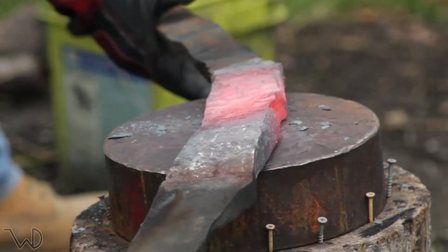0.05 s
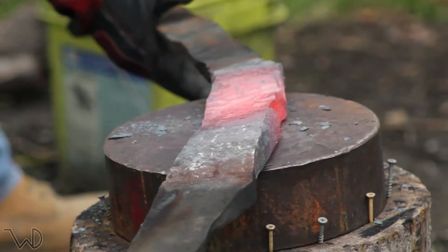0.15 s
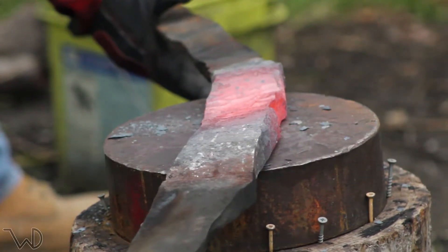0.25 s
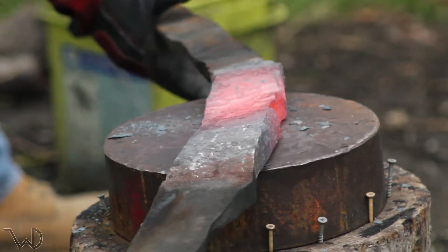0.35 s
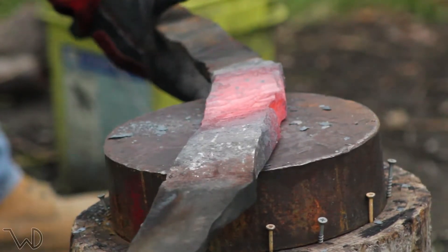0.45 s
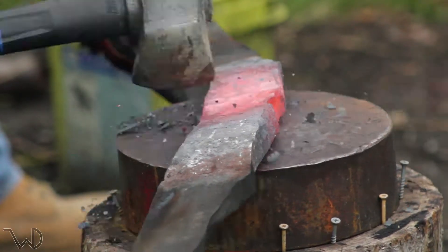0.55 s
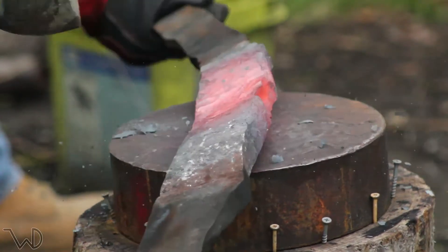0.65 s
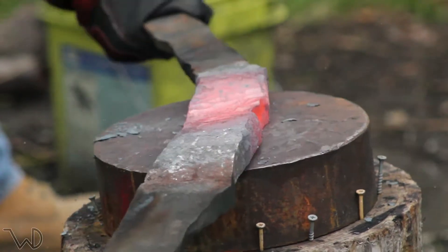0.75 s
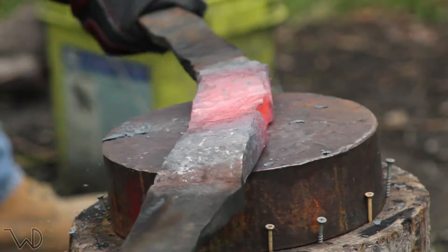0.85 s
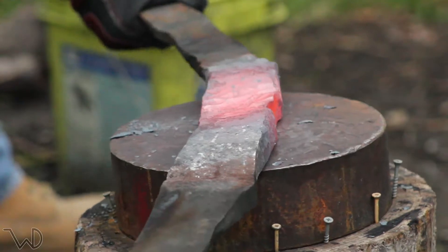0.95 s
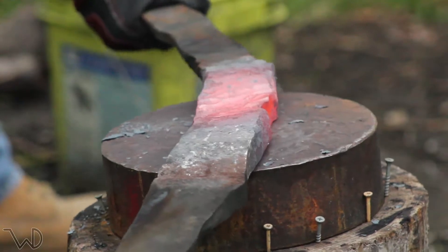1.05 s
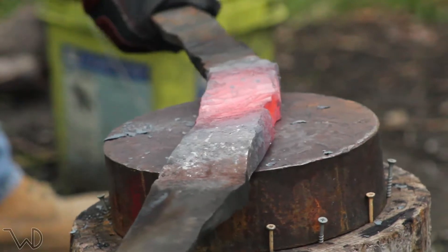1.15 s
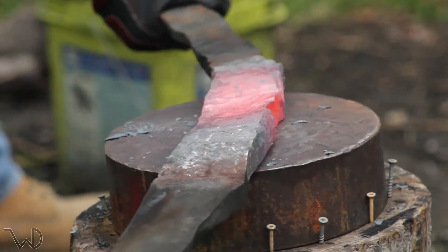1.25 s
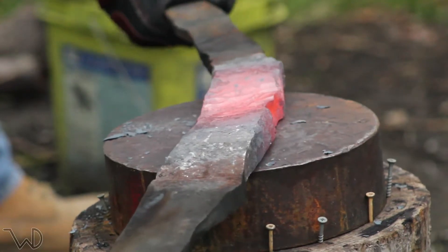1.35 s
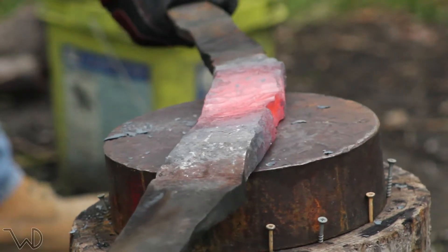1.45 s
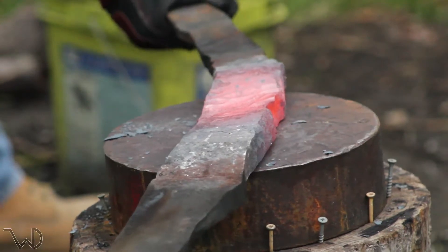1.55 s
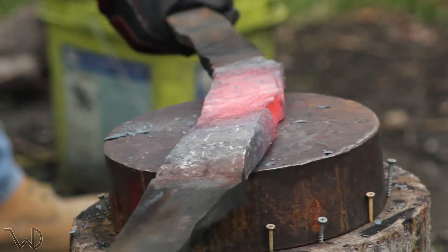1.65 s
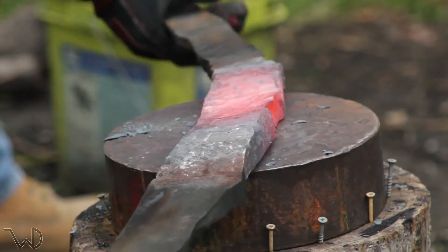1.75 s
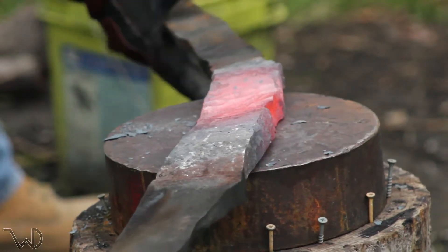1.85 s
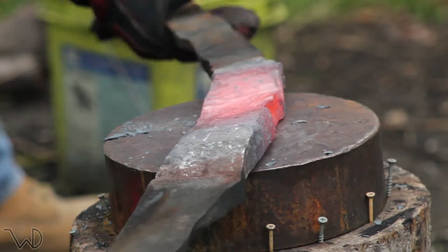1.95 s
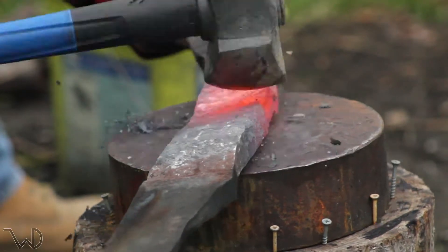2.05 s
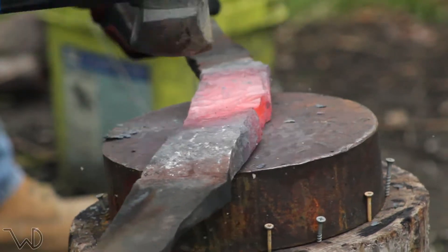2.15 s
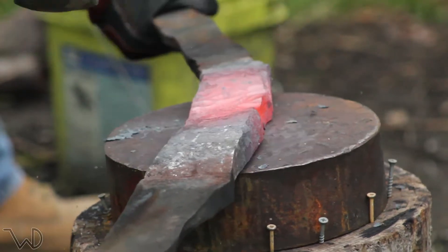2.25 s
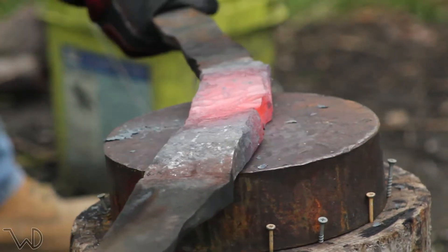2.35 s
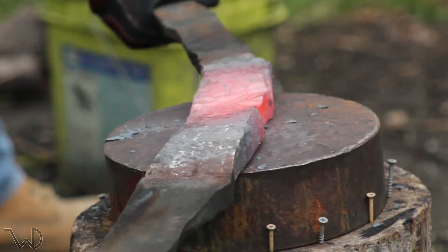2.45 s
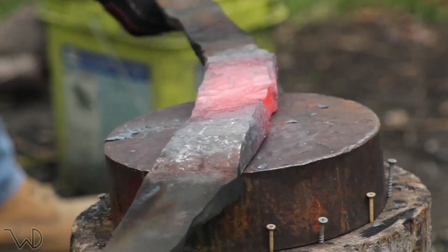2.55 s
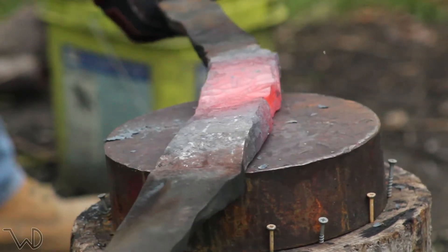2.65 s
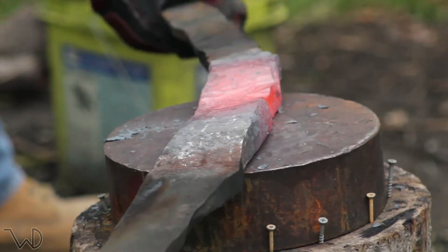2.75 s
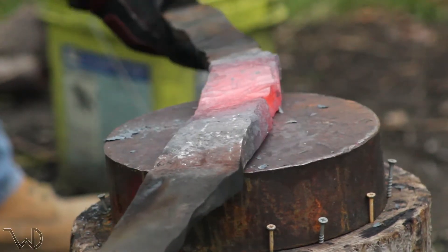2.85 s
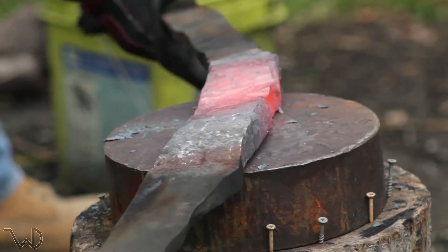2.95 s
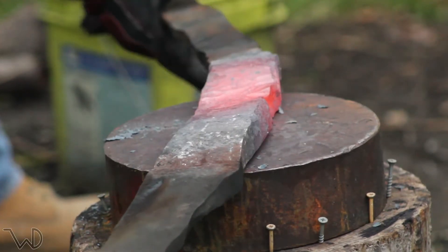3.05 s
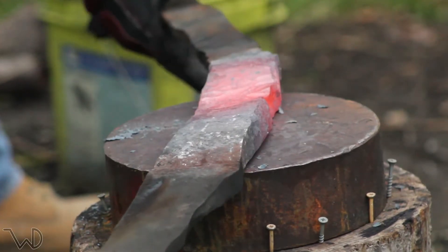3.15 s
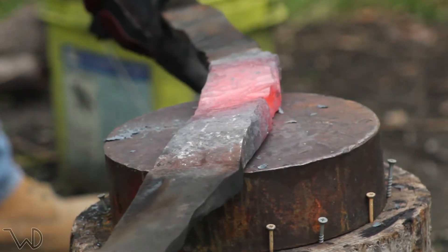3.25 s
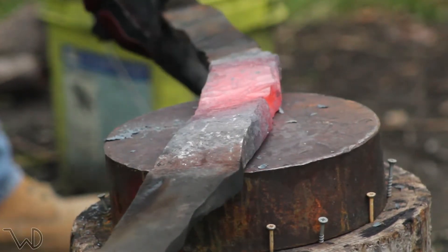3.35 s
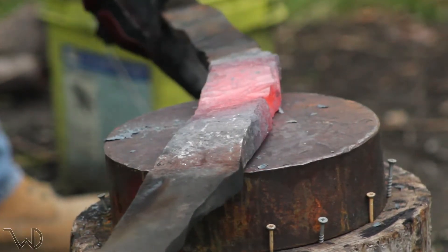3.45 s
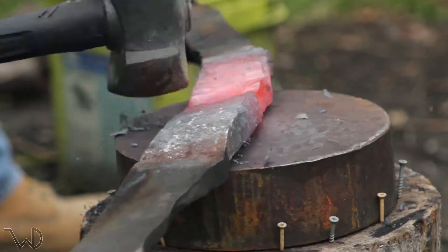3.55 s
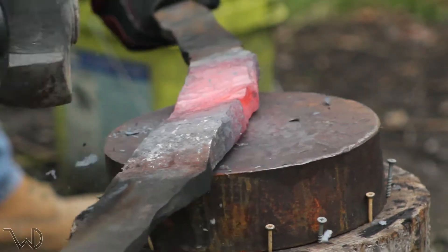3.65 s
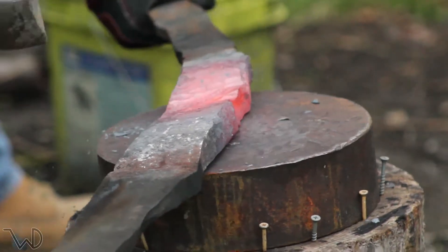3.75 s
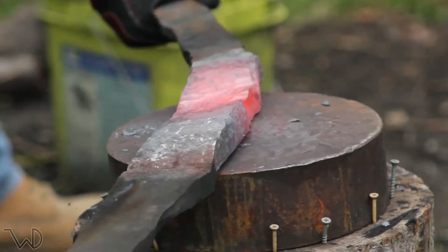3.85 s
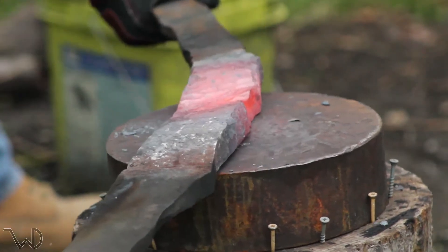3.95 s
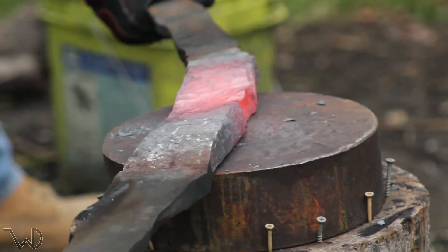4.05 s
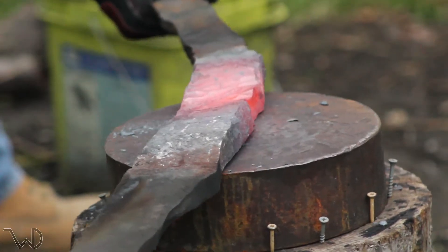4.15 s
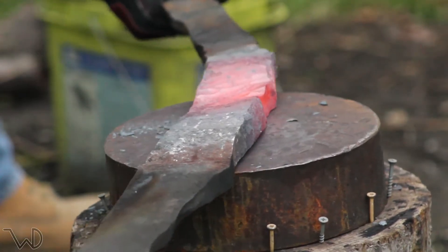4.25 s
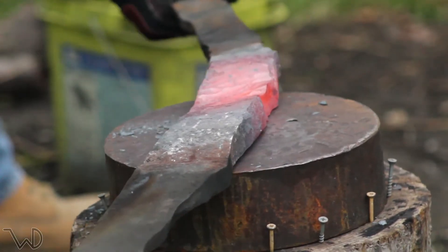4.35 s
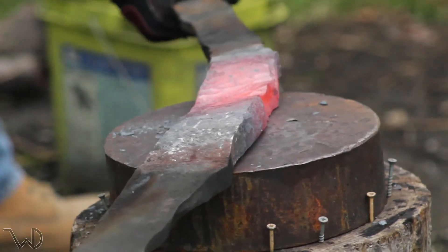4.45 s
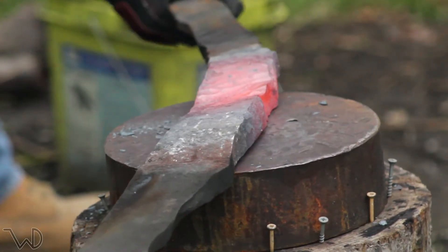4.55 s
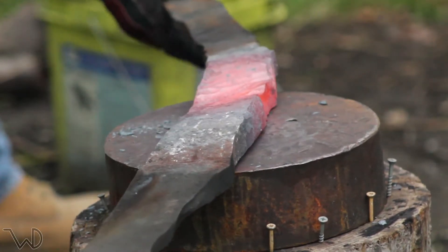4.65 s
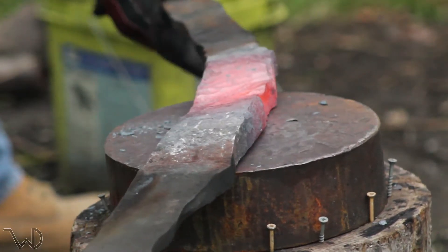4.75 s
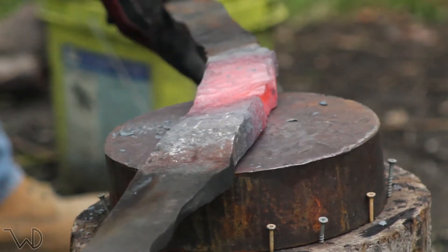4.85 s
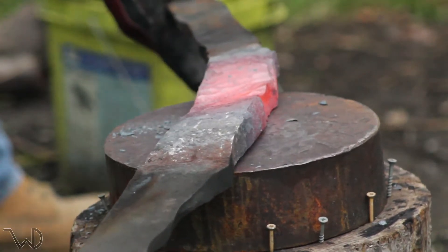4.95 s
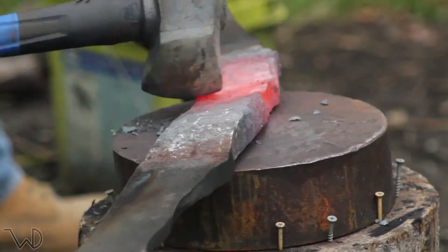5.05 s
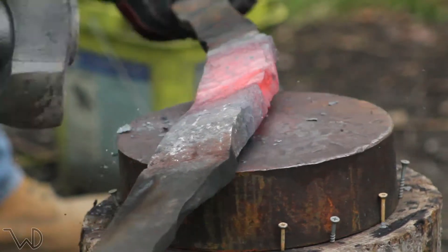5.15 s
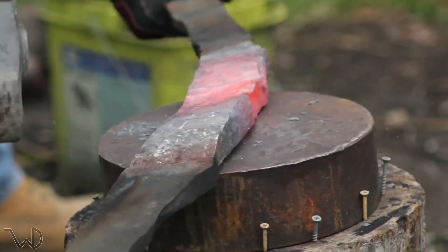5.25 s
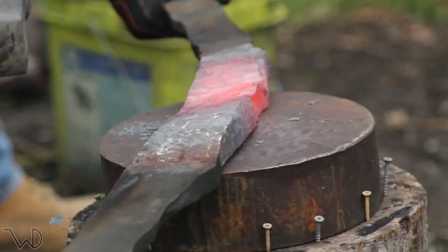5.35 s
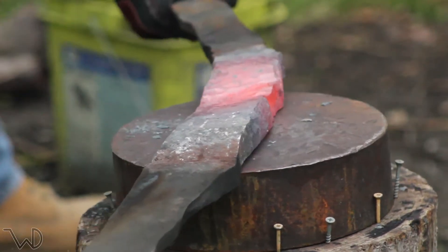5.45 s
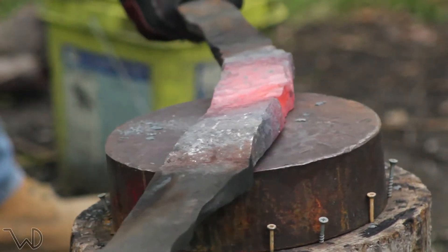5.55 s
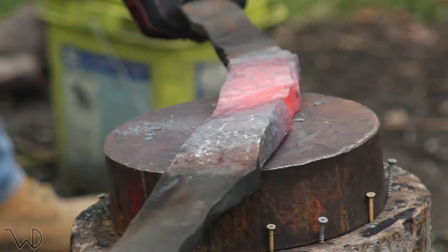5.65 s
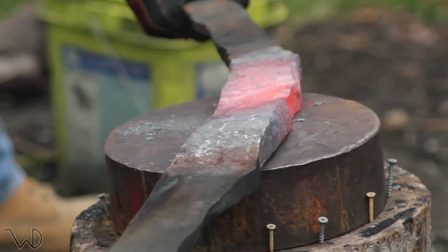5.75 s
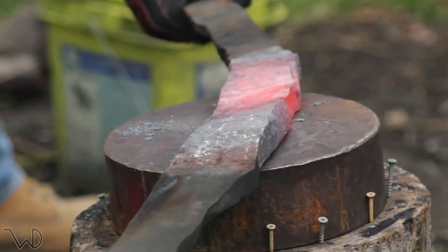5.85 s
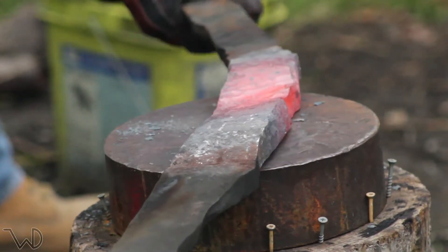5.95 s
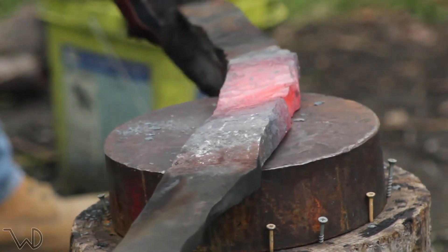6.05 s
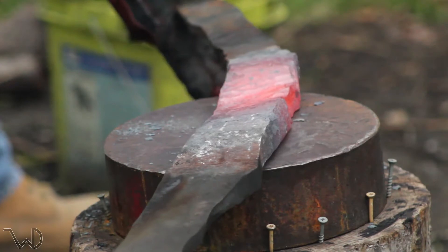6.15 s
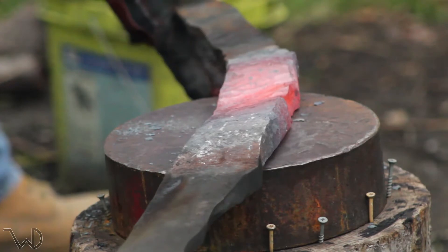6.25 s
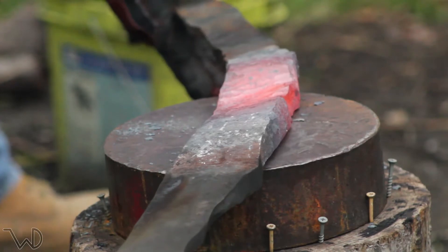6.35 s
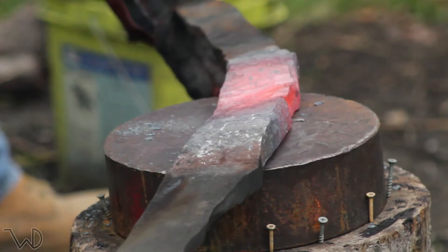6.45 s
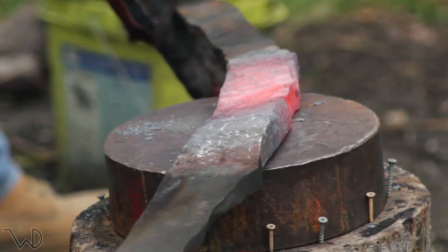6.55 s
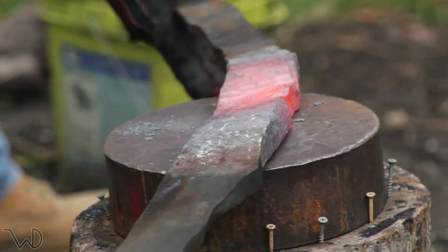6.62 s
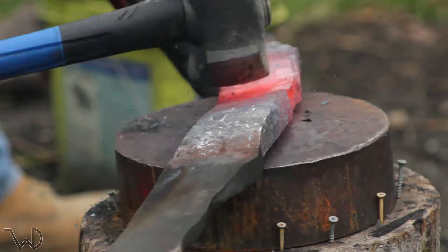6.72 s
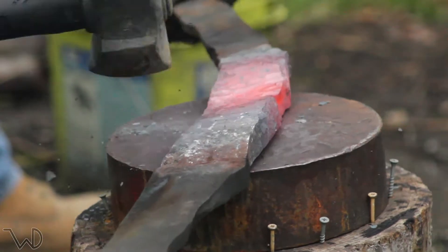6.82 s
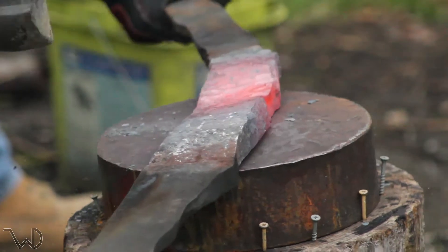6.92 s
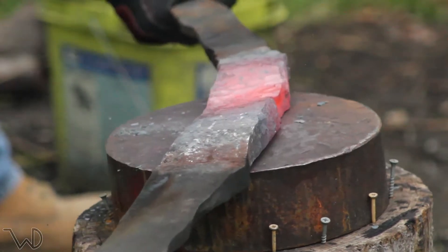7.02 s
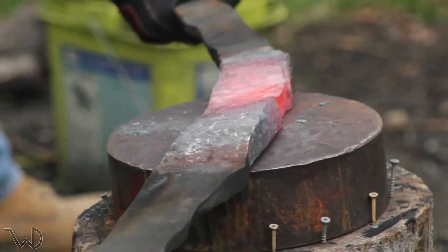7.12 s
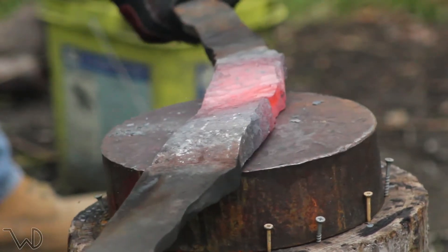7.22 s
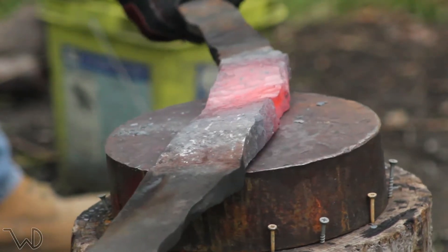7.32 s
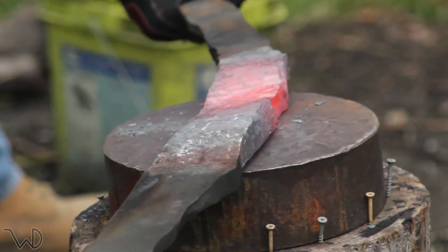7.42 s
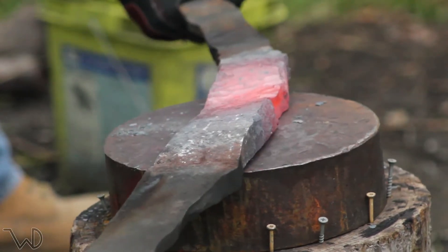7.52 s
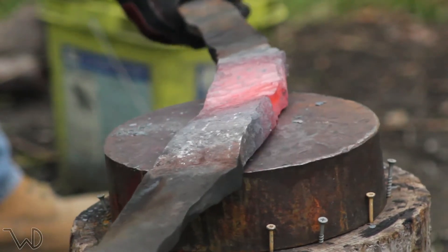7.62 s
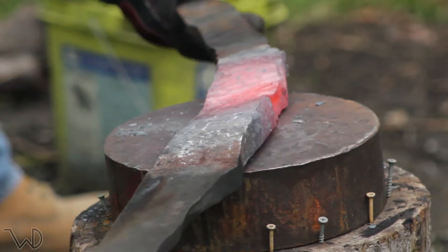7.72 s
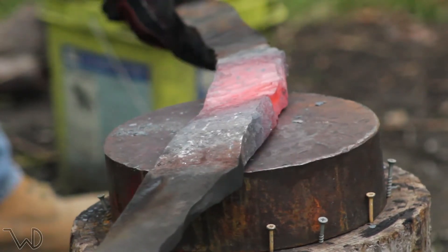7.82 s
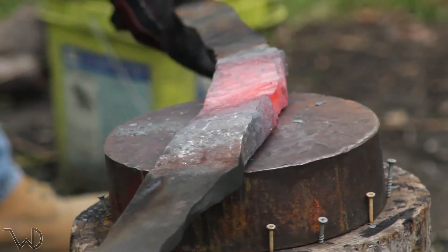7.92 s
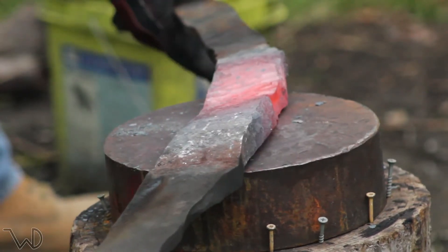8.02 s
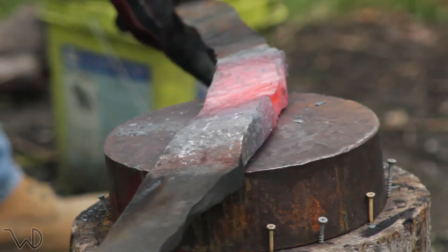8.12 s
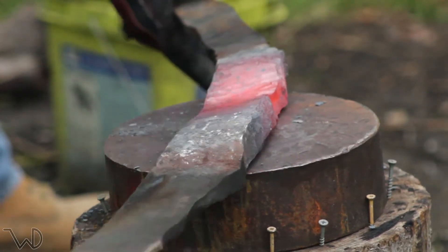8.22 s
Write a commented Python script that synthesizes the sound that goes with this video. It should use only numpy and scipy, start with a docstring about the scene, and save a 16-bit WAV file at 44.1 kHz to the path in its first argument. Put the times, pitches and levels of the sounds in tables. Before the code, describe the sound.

A hammer slowly strikes a steel blade on a metal block five times, each clang echoing over steady outdoor hiss and gusts.

```python
"""Five heavy hammer blows on a glowing steel blade, laid on a round steel block on a stump outdoors.
Blade, hammer and block ring as decaying modes and the yard throws the clang back; each blow clips the input.
Wind buffets the microphone over a steady outdoor hiss, and flakes of scale skitter off the block."""
import sys
import numpy as np
from scipy import signal
from scipy.fft import rfft, irfft, next_fast_len
from scipy.io import wavfile
from scipy.ndimage import uniform_filter1d

SR = 44100
rng = np.random.default_rng(int(sys.argv[2]) if len(sys.argv) > 2 else 0)


def put_to_file(sound):
    """Save the sound as 16-bit audio at rate SR, in the file named by the first command-line argument."""
    columns = np.atleast_2d(sound).T  # one column per channel
    safe = np.clip(columns, -1, 1)
    whole_steps = np.round(safe * 32767)
    wavfile.write(sys.argv[1], SR, whole_steps.astype(np.int16))


N = 365148
TIME_S = np.arange(N) / SR
RING_N = int(1.4 * SR)
AGE_S = TIME_S[:RING_N]


def from_db(db):
    """Decibels to gain."""
    return 10 ** (np.asarray(db) / 20)


def unit_rms(x):
    """Scale to rms 1."""
    return x / np.sqrt(np.mean(x ** 2) + 1e-20)


def at_hz(points, hz):
    """Interpolate a table over log frequency."""
    points_hz, values = np.transpose(points)
    return np.interp(np.log(np.maximum(hz, 1)), np.log(points_hz), values)


def decay(t60_s):
    """Envelope falling 60 dB in t60_s."""
    return np.exp(-np.log(1000) * AGE_S / max(t60_s, 1e-3))


def filtered(x, hz, kind, order=2):
    """Butterworth filter."""
    return signal.sosfilt(signal.butter(order, hz, kind, fs=SR, output="sos"), x)


def coloured_noise(spectrum, size):
    """Steady noise of the given spectrum, rms 1."""
    gain = from_db(at_hz(spectrum, np.fft.rfftfreq(size, 1 / SR)))
    return unit_rms(irfft(rfft(rng.standard_normal(size)) * gain, size))


def swell_power(rows):
    """Summed power of Gaussian swells."""
    return sum(from_db(db) ** 2 * np.exp(-np.minimum(((TIME_S - peak_s) / half_width_s) ** 2, 100))
               for peak_s, db, half_width_s in rows)


# hiss level: (time [s], level [dB])
HISS_LEVEL = [(0, -43), (2.5, -45.5), (8.28, -45.4)]
# hiss spectrum: (frequency [Hz], relative density [dB])
HISS_SPECTRUM = [(25, -22), (100, -11), (200, -6), (350, -1), (800, 0.5), (1400, -1), (2300, -3),
                 (5500, -6.5), (7500, -10), (9000, -18.5), (11000, -29), (13500, -42), (15000, -62)]
def outdoor_hiss():
    """Steady broadband hiss, easing a little."""
    level = from_db(np.interp(TIME_S, *np.transpose(HISS_LEVEL)))
    return level * coloured_noise(HISS_SPECTRUM, next_fast_len(N))[:N]


# wind gusts: (arrival [s], level [dB], hold [s])
WIND_GUSTS = [(.19, -56.5, .24), (.82, -46.5, 0.036), (1.5, -62, 0.26), (2.418, -56, 0.041),
              (3.165, -46.5, .02), (3.847, -53, .03), (4.408, -44, 0.85), (7.4, -47.5, 0.045)]
def breeze_power(draught_db=-68, rise_db_per_s=248, fall_db_per_s=62, flutter_db=2.3, flutter_hz=15):
    """Moving air: a faint draught plus gusts that rise fast, hold and fall slowly, all fluttering."""
    power = from_db(draught_db) ** 2
    for arrival_s, db, hold_s in WIND_GUSTS:
        rise_db = rise_db_per_s * np.maximum(arrival_s - TIME_S, 0)
        fall_db = fall_db_per_s * np.maximum(TIME_S - arrival_s - hold_s, 0)
        power = power + from_db(db - rise_db - fall_db) ** 2
    flutter = unit_rms(filtered(rng.standard_normal(N + SR), flutter_hz, "low")[SR:])
    return power * from_db(flutter_db * flutter) ** 2


# strongest buffets: (time [s], level [dB], half width [s])
WIND_BUFFETS = [(2.57, -38.5, .011), (4.03, -42, .009), (4.07, -38, 0.0045), (4.515, -29.5, 0.0074),
                (4.626, -23, .018), (4.67, -20, 0.0053), (4.706, -23.5, 0.0052), (4.812, -26.5, 0.0065),
                (4.872, -35.5, .012), (7.483, -34.5, 0.0049), (8.22, -44.5, 0.013)]
def wind(low_hz=85, calm_hz=210, strong_hz=380, calm_db=-45, strong_db=-22, window_s=0.0137):
    """Eddies at the microphone: a rumble that brightens with strength."""
    level = np.sqrt(breeze_power() + swell_power(WIND_BUFFETS))
    strength = np.clip((20 * np.log10(level) - calm_db) / (strong_db - calm_db), 0, 1)
    eddies = rng.standard_normal((2, N))
    slow = unit_rms(filtered(filtered(eddies[0], low_hz / 2, "high"), calm_hz, "low", order=3))
    fast = unit_rms(filtered(filtered(eddies[1], low_hz, "high"), strong_hz, "low", order=4))
    rumble = np.sqrt(1 - strength) * slow + np.sqrt(strength) * fast
    running_rms = np.sqrt(uniform_filter1d(rumble ** 2, int(window_s * SR)) + 1e-3)
    return level * rumble / running_rms


def air_slap(centre_hz=1050, level_db=10.5, t60_s=0.019):
    """The hammer's sudden stop pushes out a few uneven cycles of pressure."""
    puff = unit_rms(filtered(rng.standard_normal(RING_N), [centre_hz / 2, centre_hz * 2], "band"))
    return from_db(level_db) * puff * decay(t60_s)


# contact crack: (frequency [Hz], relative density [dB])
CRACK_SPECTRUM = [(40, -20), (150, -15.5), (450, -9), (800, -4), (1300, -2), (2400, -2), (4000, -3),
                  (6300, -5.5), (8000, -14), (10000, -17)]
def contact_crack(gain_db, base_db=5.5, t60_s=0.06):
    """Scale crushed under the hammer: a short noise burst."""
    return from_db(base_db + gain_db) * coloured_noise(CRACK_SPECTRUM, RING_N) * decay(t60_s)


def ring(modes, gain_db):
    """Struck modes: decaying sines of random polarity."""
    gains = from_db(gain_db) * rng.choice([-1, 1], len(modes))
    return sum(gain * from_db(db) * decay(t60_s) * np.sin(2 * np.pi * hz * AGE_S)
               for (hz, db, t60_s), gain in zip(modes, gains))


# blade pinched between hammer and block: (frequency [Hz], level [dB], t60 [s])
BLADE_MODES = [(900, -17, .06), (1002, -14, .12), (1208, -12, .11), (1262, -15, .08), (1332, -12, .12),
               (1462, -12, .1), (1555, -8.5, .11), (1688, -12, .13), (1885, -13, .17), (1962, -15, .08),
               (2141, -13, .14), (2372, -5.5, .08), (2480, -10, .045), (2641, -6.5, .16),
               (2986, -10.5, .12), (3160, -12, .06), (3320, -10, .12), (3500, -15, .06), (3636, -7, .19),
               (3810, -15, .07), (3955, -13, .08), (4059, -12, .12), (4185, -14, .1), (4545, -12, .07),
               (4936, -7, .16), (5026, -13, .1)]
def blade_ring(gain_db, tilt_db_per_oct, spot_hz, boost_db=5.0, half_width_oct=0.16):
    """Harder contact favours the upper modes; the struck spot boosts those near spot_hz."""
    mode_hz = np.array(BLADE_MODES)[:, 0]
    tilt_db = tilt_db_per_oct * np.log2(mode_hz / np.median(mode_hz))
    spot_db = boost_db * np.exp(-(np.log2(mode_hz / spot_hz) / half_width_oct) ** 2)
    return ring(BLADE_MODES, gain_db + tilt_db + spot_db)


# steel block: (frequency [Hz], level [dB], t60 [s])
BLOCK_MODES = [(5399, -14, .13), (5497, -11.5, .21), (6042, -18, .2), (6228, -19, .12), (6468, -19, .12),
               (6707, -21, .14), (7122, -22, .19), (8266, -26, .18)]
# hammer head: (frequency [Hz], level [dB], t60 [s])
HAMMER_MODES = [(7570, -21, .09), (7652, -13.5, .28)]
# block's faint, lightly damped shimmer: (frequency [Hz], level [dB], t60 [s])
SHIMMER_MODES = [(9455, -33, .6), (9528, -31, .6), (11038, -44, .6), (13135, -46, .5), (13654, -56, .65)]
def steel_clang(crack, blade, hammer_db, block_db, shimmer_db, top_hz=8500):
    """Block and hammer ring with the blade; top treble rolled off, a faint shimmer above it."""
    impact = crack + blade + ring(BLOCK_MODES, block_db) + ring(HAMMER_MODES, hammer_db)
    return filtered(impact, top_hz, "low", order=8) + ring(SHIMMER_MODES, shimmer_db)


# returns from walls and trees: (delay [s], level [dB])
YARD_RETURNS = [(.06, -7.5), (.135, -19), (.19, -27), (.325, -44)]
# late echo decay: (frequency [Hz], t60 [s])
TAIL_T60 = [(100, 0.72), (500, 0.56), (1000, 0.79), (1600, 0.92), (3000, 0.94), (5500, 0.67), (8000, 0.66),
            (14000, 0.37)]
def yard_response(near_t60_s=0.29, return_t60_s=0.12, tail_db=-8.5):
    """Impulse response: dense near scatter, smeared returns and a far tail that loses its treble."""
    near = rng.standard_normal(RING_N) * decay(near_t60_s)
    echo = near / np.linalg.norm(near)
    for delay_s, db in YARD_RETURNS:
        smear = rng.standard_normal(RING_N) * decay(return_t60_s)
        delayed = np.interp(AGE_S - delay_s, AGE_S, smear, left=0)
        echo += from_db(db) * delayed / np.linalg.norm(smear)
    white = rfft(rng.standard_normal(RING_N))
    hz = np.fft.rfftfreq(RING_N, 1 / SR)
    edges_hz = np.geomspace(30, 18000, 19)
    tail = np.zeros(RING_N)
    for low_hz, high_hz in zip(edges_hz, edges_hz[1:]):
        band = irfft(white * (hz >= low_hz) * (hz < high_hz), RING_N)
        tail += band * decay(at_hz(TAIL_T60, np.sqrt(low_hz * high_hz)))
    return echo + from_db(tail_db) * tail / np.linalg.norm(tail)


# blows: (time [s], crack gain [dB], blade gain [dB], blade tilt [dB/oct], spot frequency [Hz],
# hammer gain [dB], block gain [dB], shimmer gain [dB])
HAMMER_BLOWS = [(0.5737, -3, 0.5, 0.5, 3210, -1, 2, -2.5), (2.0718, -1.5, -10, 11, 4950, 10.5, 2.5, 1.5),
                (3.5661, -1, -2, -4, 4960, -23, -11, 1.5), (5.107, -0.5, 1.3, -1, 2840, -9, 3, 6.5),
                (6.7398, -1.5, 2.5, 2.2, 2870, 4, 4, 0)]
def hammering():
    """Each blow: a slap of air, a clang and the clang's echo."""
    out = np.zeros(N + RING_N)
    for time_s, crack_db, blade_db, tilt_db_per_oct, spot_hz, *tool_gains_db in HAMMER_BLOWS:
        crack = contact_crack(crack_db)
        blade = blade_ring(blade_db, tilt_db_per_oct, spot_hz)
        clang = steel_clang(crack, blade, *tool_gains_db)
        slap = air_slap()
        echo = signal.fftconvolve(clang, yard_response())[:RING_N]
        start = int(time_s * SR)
        out[start:start + RING_N] += slap + clang + echo
    return out[:N]


# sliding scale: (time [s], level [dB], half width [s])
FLAKE_SLIDES = [(.985, -61, 0.042), (1.046, -40, 0.011), (1.193, -62, .008)]
def scale_flakes(low_hz=5500, grain_db=6.5):
    """Thin scale sliding over steel: a faint, grainy sizzle."""
    grains = rng.standard_normal(N) * from_db(grain_db * rng.exponential(1, N))
    sizzle = unit_rms(filtered(grains, [low_hz, 2 * low_hz], "band"))
    return np.sqrt(swell_power(FLAKE_SLIDES)) * sizzle


def scene():
    """All sources at one microphone, identical in both channels."""
    mono = outdoor_hiss() + hammering() + wind() + scale_flakes()
    return np.tile(mono, (2, 1))


def record(dry):
    """Hard clip on every blow, then a steep low-pass."""
    clip_level, cutoff_hz = 0.4, 16000
    clipped = np.clip(dry, -clip_level, clip_level)
    return signal.sosfilt(signal.ellip(10, .1, 80, cutoff_hz, fs=SR, output="sos"), clipped)


dry = scene()
out = record(dry)
put_to_file(out)
```